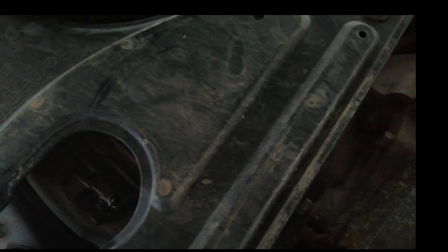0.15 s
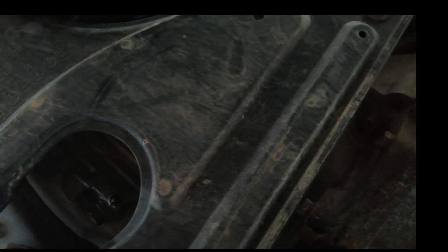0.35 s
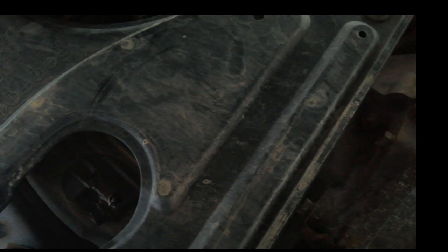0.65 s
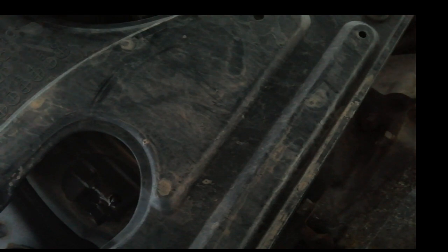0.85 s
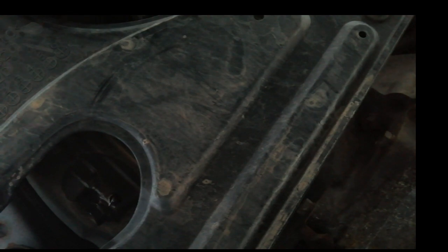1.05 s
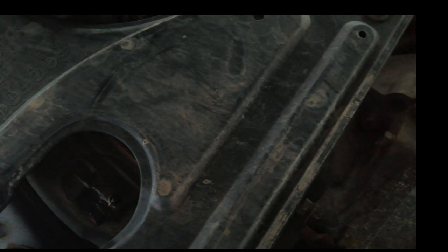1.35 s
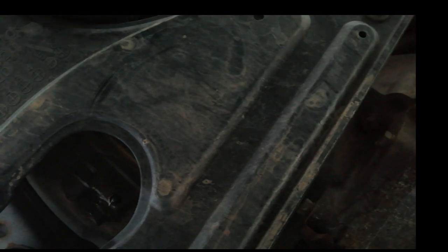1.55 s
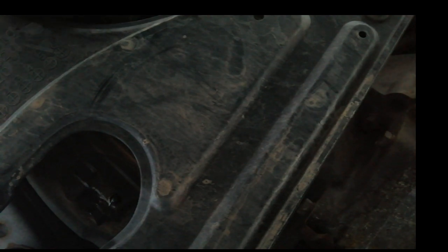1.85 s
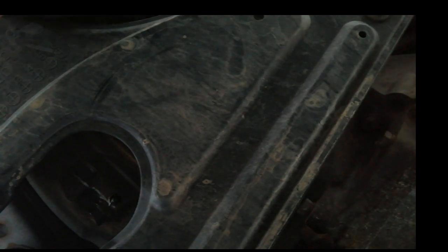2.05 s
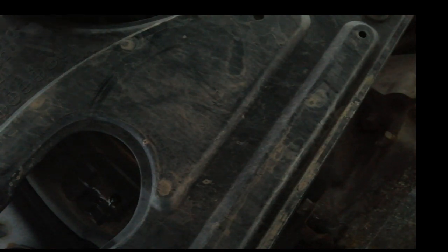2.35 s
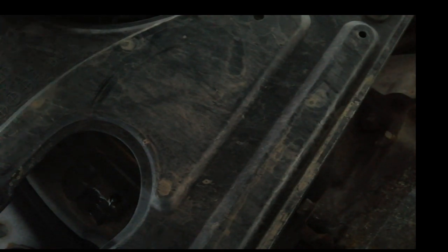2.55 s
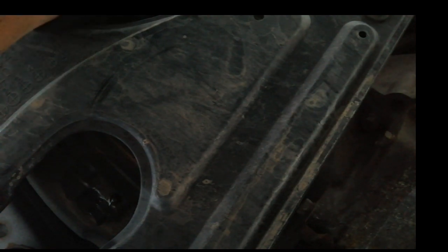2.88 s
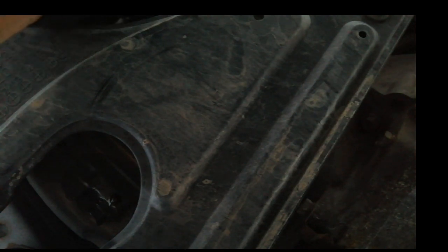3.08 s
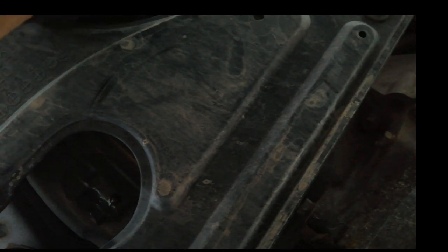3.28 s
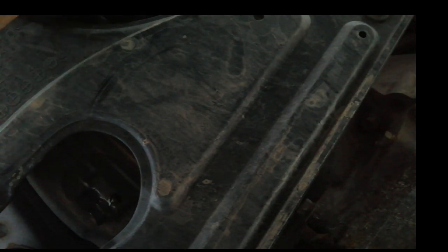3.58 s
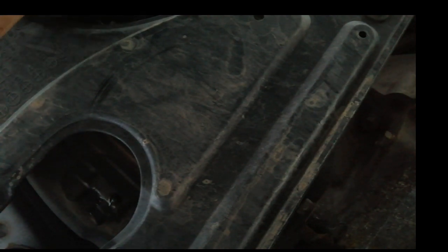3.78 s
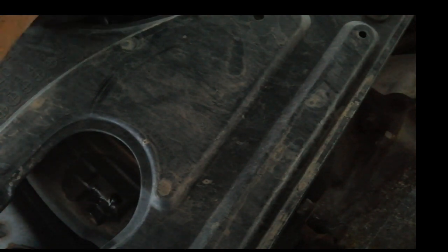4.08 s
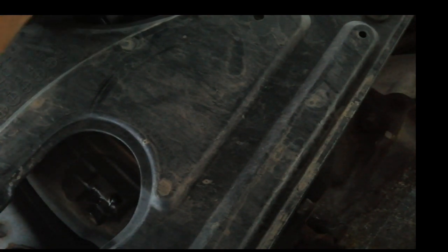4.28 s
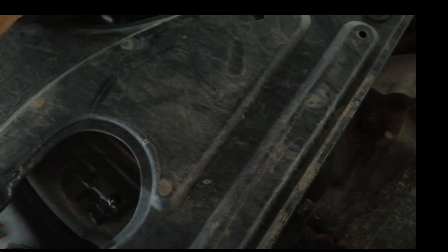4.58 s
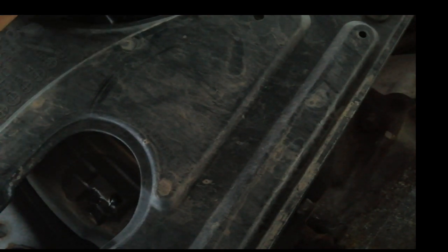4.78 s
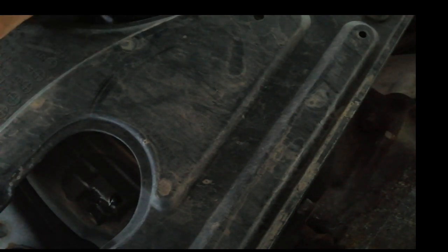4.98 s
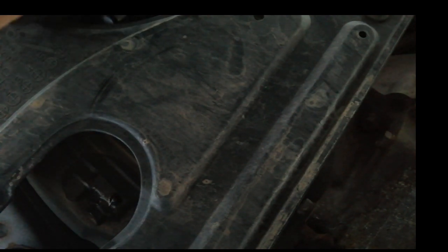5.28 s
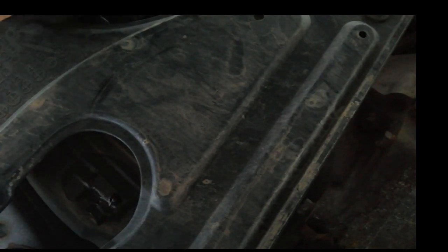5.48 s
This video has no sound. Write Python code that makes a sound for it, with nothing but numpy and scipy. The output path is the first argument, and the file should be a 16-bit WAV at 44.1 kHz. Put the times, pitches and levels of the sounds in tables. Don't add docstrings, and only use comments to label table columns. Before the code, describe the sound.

Oil drops knock irregularly into a plastic pan under a vehicle, with one hard metal clank, handling thumps and a steady high insect hiss.

```python
import sys
import numpy as np
from scipy import signal
from scipy.fft import rfft, irfft, next_fast_len
from scipy.io import wavfile
from scipy.ndimage import uniform_filter1d, minimum_filter1d, map_coordinates

SR = 44100
rng = np.random.default_rng(int(sys.argv[2]) if len(sys.argv) > 2 else 0)


def inscribe(sig):
    pcm = np.round(np.clip(np.atleast_2d(sig).T, -1, 1) * 32767)
    wavfile.write(sys.argv[1], SR, pcm.astype(np.int16))


def level_to_linear(level):
    exponent = np.asarray(level, float) / 20
    return 10 ** exponent


N = 248283

# time in seconds, pitch in Hz.
HUM_PITCH = [(0.0, 70.44), (0.61, 64.96), (0.97, 56.7), (2.13, 67.5), (2.45, 54.06), (3.55, 54.37),
             (3.75, 71), (3.87, 69.66), (4.03, 51.18), (5.63, 53.4)]
# time in seconds, level in dB.
AIR_STIR = [(0, -62), (1.0, -62.5), (1.33, -66.5), (2.18, -60), (2.74, -62.5), (3.92, -54.5), (4.61, -58.5),
            (5.63, -63)]
# frequency in Hz, density in dB per Hz.
RUMBLE_COLOUR = [(18, -42), (30, -19), (45, -6.5), (70, -2.5), (100, -3.5), (125, -10.5), (170, -51.5)]
DRONE_COLOUR = [(90, -17), (130, -1), (250, -1.5), (400, -13), (600, -38)]
OUTDOORS_COLOUR = [(180, -35), (300, -14), (421, -10.5), (606, -12), (768, -10), (1640, -8.5), (2130, -12),
                   (3670, -11.5), (4500, -12), (5850, -24.5), (9900, -120)]

# frequency in Hz, density in dB per Hz.
CHORUS_COLOUR = [(2060, -38), (3500, -38), (4020, -24.5), (4450, -12.5), (6850, -8), (7490, -1.5),
                 (7950, -1.5), (9230, -2.5), (10200, -13), (11900, -15.5), (12600, -17.5), (16400, -42.5),
                 (22000, -120)]
# time in seconds, pulses a second.
PULSE_RATE = [(0, 18.5), (2.3, 16.1), (5.63, 17)]

# start in seconds, peak in dB.
FINGER_SLIPS = [
    (0.002, -44.5),
    (0.248, -43),
    (0.284, -53),
    (0.315, -30.5),
    (0.369, -48),
    (0.457, -30.5),
    (0.496, -31),
    (0.51, -34.5),
    (0.887, -38),
]
# start in seconds, peak in dB, pitch in Hz.
LONE_THUMPS = [
    (0.037, -40.5, 66),
    (0.237, -47, 68),
    (0.451, -42.5, 72.85),
    (0.707, -25, 60),
    (1.565, -31, 52.3),
    (2.187, -27.5, 57.2),
    (2.541, -29, 54),
]
# start in seconds, peak in dB, lag of the second in seconds, its peak in dB.
THUMP_PAIRS = [
    (2.952, -34.5, 0.15, -35),
    (3.43, -32.5, 0.144, -32),
    (3.942, -32.5, 0.15, -33.5),
    (4.467, -33.5, 0.13, -35.5),
    (4.941, -34, .162, -36),
    (5.451, -36.5, 0.13, -35),
]
# start in seconds, hold in seconds, housing level in dB, rasp level in dB.
FINGER_STROKES = [(0.253, 0.036, -50, -54), (0.297, 0.066, -46.5, -46.5), (0.463, 0.055, -42, -49),
                  (0.704, 0.034, -56.5, -60), (0.86, 0.031, -66, -56), (1.106, 0.028, -86, -57.5),
                  (1.221, 0.023, -73.5, -59.5), (2.116, 0.098, -59, -74), (2.393, 0.11, -57.5, -51),
                  (2.816, 0.03, -68.5, -50), (4.195, 0.06, -63.5, -80), (4.607, 0.056, -73, -54.5),
                  (5.235, 0.023, -73, -57)]
# centre in Hz, width in Hz, level in dB.
HOUSING_PEAKS = [(163, 36.4, 0), (228.5, 49, -1), (302, 210, -12.5)]
RASP_PEAKS = [(568, 29, 1.5), (792, 29, -1.5), (995, 50, 3), (1565, 77, -5), (1950, 250, -16.5),
              (2980, 360, -15)]

# mode in Hz, level in dB, 60 dB decay in seconds, # left-right
# difference in dB, left lead in radians.
LOW_PAN_MODES = [(378, -26.5, 0.078, -8, 3.5), (725, -5, 0.082, -1.5, 4.5), (824, -9, 0.06, -12.5, 0),
                 (982, 1, 0.061, -2, 0.86), (1028.3, -4, 0.049, -16.5, 3.0),
                 (1128.7, -1.5, 0.081, -2.5, 1.34), (1190, -18.5, 0.05, 7.5, 1),
                 (1301, -7, 0.09, -16.5, -1.5), (1378.5, -1.5, 0.064, -0.5, -5),
                 (1400, -14.5, 0.084, -3.5, 1), (1507, -0.5, 0.036, 6.5, 1), (1555, -10, 0.05, 10, 1),
                 (1611, -2.5, 0.054, 7.5, 1.06), (1820, -15.5, 0.09, -5, 7)]
# mode in Hz, level in dB, 60 dB decay in seconds,
# left-right difference in dB, left lead in radians.
WALL_MODES = [(2080, -25.5, 0.1, 1, -0.5), (2224, -13, 0.1, -3, 3), (2524, -9.5, 0.1, 2, -1.5),
              (2642, -13, 0.11, -7, -2), (2755, -13.5, 0.081, -9.5, 1), (3167, -18, 0.11, -7, 0.96),
              (3480, -24, 0.093, -10, 3.5), (3810, -23, 0.11, -7.5, -3.5), (4290, -31, 0.12, -15.5, 2),
              (5180, -33, 0.054, -25, -7.5), (5100, -29, 0.081, -5.5, 0.5), (4820, -30.5, 0.11, -10.5, 4.5)]
# start in seconds, peak in dB, favoured pitch in Hz, thud in dB.
BRIGHT_FLECKS = [
    (0.19, -42.5, 1010, -9),
    (0.689, -36.5, 1420, -19),
    (4.085, -32, 1440, -38.5),
    (4.571, -47, 3700, -31),
    (5.397, -61, 980, -5),
]
# start in seconds, peak in dB, favoured pitch in Hz, thud in dB.
DULL_BLOBS = [(1.659, -29, 1500, -26), (1.664, -26, 976, -28), (1.68, -31, 1360, -17.5),
              (2.41, -23, 1600, -18), (2.768, -25, 1400, -24.5), (3.242, -27, 1187, -21.5),
              (3.368, -31, 970, -8.5), (3.479, -45, 1300, -21.5), (3.704, -29.5, 858, -26.5),
              (3.838, -27.5, 1105, -43), (4.16, -52, 1230, 1.5)]
# start in seconds, peak in dB, favoured pitch in Hz, thud in dB.
SOFT_SMEARS = [
    (2.034, -47, 969, -21),
    (3.697, -40.5, 997.6, -6),
    (4.577, -31.5, 1210, -20),
    (5.221, -41, 954, -5.5),
]
# upper modes in dB, 60 dB decay in seconds, smear in Hz.
BLOB_TONE = (-18.5, 0.089, 125)
FLECK_TONE = (-11, 0.07808, 195)
SMEAR_TONE = (-17.5, 0.14, 50)
# frequency in Hz, 60 dB decay in seconds.
UNDERSIDE_DECAY = [(300, 0.13), (1000, 0.22), (3000, 0.18), (10000, 0.024)]

# start in seconds, hold in seconds,
# level in dB, # centre in Hz, width in Hz.
NOISE_BURSTS = [(4.014, 0.01, -55.5, 580, 90), (4.049, 0.0094, -44.5, 3100, 1200),
                (4.049, .003, -43.5, 3000, 3600), (4.086, 0.0037, -39, 2600, 2100),
                (4.095, .018, -47.5, 1600, 800), (.905, 0.043, -49, 215, 29), (3.838, .008, -49, 3300, 500),
                (4.576, .008, -50.5, 3850, 410), (5.235, 0.027, -50, 3260, 1000),
                (4.922, 0.03, -51, 1390, 53), (1.67, 0.025, -46, 1500, 900), (3.7, .1, -54, 3500, 1500),
                (2.2, 0.039, -63, 570, 73), (4.8, 0.044, -66, 252, 53), (5, 0.062, -55, 975, 70),
                (4.14, 0.014, -55, 3200, 1000), (4.6, 0.012, -54.5, 840, 350), (5.2, 0.01, -60, 1200, 400),
                (4.275, 0.042, -55.5, 2500, 600), (4.4, 0.013, -53, 3700, 1500),
                (4.2, 0.054, -73, 2900, 1500), (4.5, 0.019, -53, 2500, 1100), (0.27, .008, -54, 2150, 760)]

# start in seconds, peak in dB.
CLOTH_TICKS = [(0.7893, -37.5), (1.058, -42), (1.1841, -37.5), (3.369, -34.5), (4.336, -32.5),
               (4.366, -33.5), (4.4688, -31), (4.575, -26), (4.5807, -32), (4.599, -30), (4.809, -33.5),
               (5.231, -40)]
# start in seconds, hold in seconds, level in dB.
CLOTH_STROKES = [
    (3.635, 0.23, -56.5),
    (4.3, 0.17, -50.5),
    (4.584, 0.01, -42),
    (4.65, 0.29, -58.5),
    (4.798, 0.012, -57.5),
    (4.966, 0.017, -47.5),
    (5.23, 0.014, -47),
]
# frequency in Hz, density in dB per Hz.
CLOTH_COLOUR = [(2000, -22.5), (3600, -11.5), (5500, -11), (8500, -10), (10300, -1.5), (12000, -10.5),
                (15800, -22)]

# start in seconds, peak in dB.
CLANK_HIT = [
    (1.543, -3.5),
]
# pitch in Hz, level in dB, 60 dB decay in seconds.
CLANK_BOOM = (380, -21.5, 0.15)
# pitch in Hz, level in dB, 60 dB decay in seconds.
CLANK_MODES = [(946, -6, 0.11), (997, -11.5, 0.09), (1204, -11, 0.09), (1286, -9, 0.14), (1365, -7.5, 0.13),
               (1467, -8.5, 0.098), (1662, -10, 0.15), (1760, -8, 0.1), (1848, -5.5, 0.1), (1890, -9, 0.09),
               (1990, -10, 0.075), (2760, -9.5, 0.08), (3460, -18.5, 0.062), (3690, -19, 0.068),
               (2130, -6.5, 0.1), (2333, -11.5, 0.09), (2580, -13.5, 0.13), (2954, -5.5, 0.08),
               (3170, -9.5, 0.073), (4670, -26.5, 0.085), (1586, -9, 0.1), (5880, -31, 0.19),
               (7160, -30, 0.055), (9550, -25, 0.084), (9030, -14.5, 0.062), (10580, -1.5, 0.044),
               (10770, -8, 0.06), (10700, -14.5, 0.045), (11600, -7.5, 0.03), (13600, -21.5, 0.0513),
               (14000, -40, 0.12)]
# frequency in Hz, density in dB per Hz.
CRACK_COLOUR = [(150, -39.5), (250, -14.5), (660, -20), (967, -14.5), (1230, -5), (1520, -2), (2510, -12.5),
                (3150, -4), (3430, -12), (6190, -26), (6750, -19.5), (10800, -23.5), (15800, -39)]
# mode in Hz, level in dB, 60 dB decay in seconds, left-right difference in dB.
STEEL_MODES = [(802, -8, .35, -20), (866, -1, .6, -12), (985, -9, .22, -8), (1168, -4, .45, -7),
               (1382, -7, .35, -2), (1514, -7, .9, 2), (1650, -12, .35, 3)]

# start in seconds, peak in dB, favoured pitch in Hz, hardness in dB,
# favoured wall pitch in Hz.
OIL_DROPS = [
    (2.108, -7, 1007, -21, 2760),
    (3.076, -9, 1086, -18.5, 2600),
    (3.517, -19.5, 1090, -22, 2620),
    (4.4, -3.5, 1350, -11.5, 3170),
    (4.915, -26.5, 982, -23.5, 2500),
    (5.443, -7, 1000, -13, 2580),
]
# pitch in Hz, level in dB, second pitch in Hz, its level in dB.
DROP_QUIRKS = [(1128, 4.5, 1615, 4), (1128, 2, 1520, 4), (985, -3.5, 1128, 5), (1034, 12.5, 960, 7),
               (1390, 6, 1800, -6), (1128, 0.5, 1530, 7.5)]
# frequency in Hz, density in dB per Hz.
SPRAY_COLOUR = [(240, -63.5), (600, -33), (900, -11.5), (1200, -0.5), (1640, -8), (2090, -18.5),
                (3210, -15), (4600, -28), (6000, -33.5), (10400, -33), (14000, -49.5)]

# start in seconds, peak in dB, pitch in Hz, glide in Hz a second,
# 60 dB decay in seconds.
OIL_BUBBLE = (4.161, -36, 1290, -4000, .08)


def unit(x):
    return x / np.sqrt(np.mean(x ** 2) + 1e-20)


def along(points, hz):
    f, v = np.transpose(points)
    return np.interp(np.log(hz + 1), np.log(f + 1), v)


def curve(rows):
    s, value = np.transpose(rows)
    return np.interp(np.arange(N) / SR, s, value)


def gains(s, hold, db, rise, fall):
    t = np.arange(0, N + 64, 64) / SR
    late = t - s[:, None]
    swell = rise * np.minimum(late, 0)
    fade = fall * np.maximum(late - hold[:, None], 0)
    gain = level_to_linear(db[:, None] + swell - fade).sum(axis=0)
    return np.interp(np.arange(N) / SR, t, gain)


def wobble(rate):
    knots = rng.standard_normal(int(N * rate / SR) + 4)
    return map_coordinates(knots, [np.arange(N) * rate / SR])


def filtered(x, response):
    m = next_fast_len(N + SR // 2)
    return irfft(rfft(x, m) * response(np.fft.rfftfreq(m, 1 / SR)), m)[..., :N]


def resonances(peaks):
    def response(f):
        total = 0
        for k, (centre, width, db) in enumerate(peaks):
            band = 1j * f * width
            total = total + (-1) ** k * level_to_linear(db) * band / (centre * centre - f * f + band)
        return total
    return response


def pair(alike, spiky_db=0):
    a, b = rng.standard_normal((2, N)) * level_to_linear(spiky_db * np.minimum(rng.exponential(size=N), 5))
    turn = np.arccos(np.clip(alike, -1, 1)) / 2
    mid, side = np.cos(turn) * a, np.sin(turn) * b
    return np.array([mid + side, mid - side])


def rush(spectrum, alike, spiky_db=0, ripple_db=0):
    voices = rng.standard_normal(SR // 100)

    def colour(hz):
        return level_to_linear(along(spectrum, hz) + ripple_db * map_coordinates(voices, [hz / 60]))
    return unit(filtered(pair(alike, spiky_db), colour))


def add(track, s, sound):
    start = round(s * SR)
    track[:, start:start + sound.shape[1]] += sound[:, :N - start]


def patchy(x, depth_db):
    z = signal.stft(x, nperseg=512)[2]
    field = uniform_filter1d(rng.standard_normal(z.shape[1:]), size=6, axis=0)
    field = uniform_filter1d(field, size=10, axis=1)
    return unit(signal.istft(z * level_to_linear(depth_db * unit(field)), nperseg=512)[1][:, :N])


def surroundings():
    turns = np.cumsum(curve(HUM_PITCH) + 3 * wobble(12)) / SR
    hum = level_to_linear(-49 + 2.8 * wobble(12)) * np.sin(2 * np.pi * turns + [[-.1], [.1]])
    air_db = curve(AIR_STIR)
    rumble = level_to_linear(-57 + 0.24 * (air_db - air_db.min())) * rush(RUMBLE_COLOUR, 0.98)
    drone = level_to_linear(-66.5 + 1.5 * wobble(12)) * rush(DRONE_COLOUR, 0.86)
    open_air = patchy(rush(OUTDOORS_COLOUR, 0.049), depth_db=3.5)
    return hum + rumble + drone + level_to_linear(air_db + 0.5 + 1.5 * wobble(15)) * open_air


def insects():
    t = np.arange(N) / SR
    voices_db = 1.8
    chorus = level_to_linear(-48 + 0.72 * wobble(8.1)) * rush(CHORUS_COLOUR, 0.027, ripple_db=voices_db)
    hush_s, resume_s, hush_db, resume_db_per_s = 1.55, 5.25, -16.5, 25
    recovery_db = hush_db + resume_db_per_s * np.maximum(t - resume_s, 0)
    startled_db = (t > hush_s) * np.minimum(recovery_db, 0)
    low_band = [(5900, -45.5), (6450, 2.0), (7100, 0.0), (7700, -34.0)]
    low = level_to_linear(-56.5 + startled_db + 0.76 * wobble(31)) * rush(low_band, .03, ripple_db=voices_db)
    whistle = level_to_linear(-64.5 + 2.5 * wobble(2)) * np.sin(2 * np.pi * 8075 * t + [[0], [1.2]])
    turns = np.cumsum(curve(PULSE_RATE)) / SR + .4
    beat = .4 + .6 * (.5 + .5 * np.cos(2 * np.pi * turns)) ** 1.5
    top_band = [(11000, -26.0), (12600, -3.0), (13600, -3.5), (14700, 2.5), (15800, -6.5)]
    pulsing = level_to_linear(-64.5 + 1.5 * wobble(4.3)) * beat * rush(top_band, .05)
    return (chorus + low + whistle + pulsing) * level_to_linear([[-.9], [.9]])


def splash(t60, alike=0.41):
    t = np.arange(SR // 6) / SR
    envelope = level_to_linear(-60 * t / t60) * (1 - np.exp(-t / 0.0017))
    a, b = rng.standard_normal((2, len(t))) * envelope
    side = np.sqrt(1 - np.clip(alike, 0, 1))
    return np.array([a + side * b, a - side * b])


def thumps():
    out, t = np.zeros((2, N)), np.arange(SR // 8) / SR
    pair_hz, half_cycles = 54, 0.88
    hits = list(LONE_THUMPS)
    for s, first_db, lag, second_db in THUMP_PAIRS:
        hits += [(s, first_db, pair_hz), (s + lag, second_db, pair_hz)]
    for s, db, hz in hits:
        late, half = t - .05, half_cycles / hz
        push = np.sin(2 * np.pi * hz * late + [[-.1], [.1]])
        add(out, max(s - .025, 0), level_to_linear(db) * np.exp(-.5 * (late / half) ** 2) * push)
    return out


def fingers():
    slips = np.zeros((2, N))
    for s, db in FINGER_SLIPS:
        add(slips, s, level_to_linear(db + 9.0) * splash(t60=0.05, alike=0.27))
    s, hold, housing_db, rasp_db = np.transpose(FINGER_STROKES)
    rise, fall = 600, 410
    shell_noise = unit(filtered(pair(0.93, spiky_db=2), resonances(HOUSING_PEAKS)))
    shell = gains(s, hold, housing_db, rise, fall) * shell_noise
    grains = pair(0.078, spiky_db=3.0) * level_to_linear(3.4 * wobble(80))
    rasp_noise = unit(filtered(grains, resonances(RASP_PEAKS)))
    rub = level_to_linear(-3.0) * gains(s, hold, rasp_db, rise, fall) * rasp_noise
    skin = level_to_linear([[2.5], [-1]]) * (rub + filtered(slips, resonances(RASP_PEAKS)))
    return shell + skin + level_to_linear(-9.5) * filtered(slips.sum(axis=0), resonances(HOUSING_PEAKS))


def ring(hz, db, t60, side_db, lead, rise, blur_hz, punch=0.87):
    t = np.arange(int(SR * .6 * t60.max())) / SR
    ear = np.array([.5, -.5])[:, None]
    first = 1 + punch * np.exp(-t / 0.052)
    decay = first * level_to_linear(-60 * t / t60[:, None]) * (1 - np.exp(-(t / rise) ** 2))
    steps = rng.standard_normal((len(hz), SR // 32))
    knots = np.cumsum(steps, axis=1) * np.sqrt(2 * np.pi * np.abs(blur_hz) * 32 / SR)
    coarse = t[::32]
    wander = np.array([np.interp(t, coarse, k[:len(coarse)]) for k in knots])
    phase = 2 * np.pi * hz[:, None] * t + wander
    level = level_to_linear(db + ear * side_db)[..., None]
    out = (level * np.sin(phase + (ear * lead)[..., None]) * decay).sum(axis=1)
    return out / np.abs(out).max(axis=1).mean()


def pan_ring(spot_hz, favour_db, upper_db, pan_db, shorter, rise, blur_hz, wall_hz=1, also=(1, 0, 1, 0), lag=0):
    hz, level, t60, side_db, lead = np.transpose(LOW_PAN_MODES + WALL_MODES)
    upper = hz > 1950

    def near(centre_hz, width):
        return np.exp(-(np.log(hz / centre_hz) / width) ** 2)
    hardness_db = upper_db + 21.0 + (upper_db + 18.0) * 1.7 * np.log(hz / 2600)
    favour = favour_db * near(spot_hz, 0.18) + hardness_db * upper + 4.2 * near(wall_hz, 0.072)
    for at_hz, db in (also[:2], also[2:]):
        favour = favour + db * near(at_hz, 0.035)
    chance_db = (0.49 + 1.5 * upper) * rng.standard_normal(len(hz))
    decay = t60 * shorter * (1 - 0.12 * upper)
    rise = rise * (1 + lag * upper[:, None])
    return ring(hz, level + favour + chance_db, decay, side_db + pan_db, lead, rise, blur_hz)


def spatters():
    out, thuds = np.zeros((2, 2, N))
    kinds = (DULL_BLOBS, BLOB_TONE), (BRIGHT_FLECKS, FLECK_TONE), (SOFT_SMEARS, SMEAR_TONE)
    for rows, (upper_db, t60, smear_hz) in kinds:
        spread = t60 / 0.079
        rise = 0.00052 * spread ** 5
        for s, db, spot_hz, thud_db in rows:
            knock = pan_ring(spot_hz, 8.5, upper_db, 1.2, 1.47 * spread, rise, blur_hz=smear_hz)
            add(out, s - .001, level_to_linear(db + 1.0) * knock)
            add(thuds, s, level_to_linear(db + thud_db + 20.0) * splash(0.81 * t60, alike=0.8204))
    return out + filtered(thuds, resonances([(255, 75, 2.0), (427, 250, -5.0), (656, 350, -5.5)]))


def underside(x):
    hz, t, z = signal.stft(rng.standard_normal((2, SR // 3)), SR, nperseg=256)
    fade = level_to_linear(-60 * t / along(UNDERSIDE_DECAY, hz)[:, None])
    tail = signal.istft(z * fade, SR, nperseg=256)[1]
    return signal.fftconvolve(x, tail / np.linalg.norm(tail[0]), axes=1)[:, :N]


def bursts():
    out, t = np.zeros((2, N)), np.arange(SR // 6) / SR - .01
    f = np.fft.rfftfreq(len(t), 1 / SR)
    rise, fall = 4000, 860
    for s, hold, db, hz, width_hz in NOISE_BURSTS:
        noise = rng.standard_normal((2, len(t))) * level_to_linear(2.6 * rng.standard_normal(len(t)))
        band = unit(irfft(rfft(noise) / (1 + ((f - hz) / width_hz * 2) ** 4), len(t)))
        stroke_db = db + rise * np.minimum(t, 0) - fall * np.maximum(t - hold, 0)
        add(out, s - .01, level_to_linear(stroke_db) * band)
    return out


def cloth():
    snaps = np.zeros((2, N))
    for s, db in CLOTH_TICKS:
        add(snaps, s, level_to_linear(db + 11.5) * splash(t60=0.018))
    ticks = filtered(snaps, resonances([(10500, 730, 0.011)]))
    grain = level_to_linear(2 * wobble(70)) * rush(CLOTH_COLOUR, .45, spiky_db=4.5)
    strokes = gains(*np.transpose(CLOTH_STROKES), rise=740, fall=430) * grain
    return level_to_linear([[3], [-1.5]]) * (strokes + ticks)


def steel_ring(tilt):
    hz, level, t60, side_db = np.transpose(STEEL_MODES)
    chance = rng.standard_normal((3, len(hz)))
    level = level + 1.2 * chance[0] + tilt * (hz - 1200)
    return ring(hz, level, t60, side_db + 2 * chance[1], .5 * chance[2], rise=0.004, blur_hz=2.5)


def clank():
    out, crack = np.zeros((2, 2, N))
    hz, level, t60 = np.transpose([CLANK_BOOM, *CLANK_MODES])
    chance = rng.standard_normal((2, len(hz)))
    side_db = 3.4 * chance[0] - 1.5 + 0.00098 * hz
    lead = 1.37 * chance[1] * np.minimum(hz / 1200, 1) ** 2
    blur_hz = 1.5 + 0.0036 * hz[:, None]
    s, db = CLANK_HIT[0]
    metal = ring(hz, level, 0.71 * t60, side_db, lead, rise=0.0022, blur_hz=blur_hz, punch=-0.33)
    add(out, s - .001, level_to_linear(db + 2.0) * metal)
    add(out, s, level_to_linear(db - 27.5) * steel_ring(tilt=0.017))
    add(crack, s - .0005, level_to_linear(db + 4.5) * splash(t60=0.089))
    return out + filtered(crack, lambda f: level_to_linear(along(CRACK_COLOUR, f)))


def drops():
    out, spray = np.zeros((2, 2, N))
    blur_hz = 3.9 * (np.array(LOW_PAN_MODES + WALL_MODES)[:, :1] / 1000) ** 1.8
    for (s, db, spot_hz, upper_db, wall_hz), also in zip(OIL_DROPS, DROP_QUIRKS):
        lag = .25 * max(-15 - upper_db, 0)
        knock = pan_ring(spot_hz, 10.4, upper_db, 1.3, shorter=1.0, rise=.0012, blur_hz=blur_hz,
                         wall_hz=wall_hz, also=also, lag=lag)
        add(out, s - .0007, level_to_linear(db + 4.5) * knock)
        add(out, s, level_to_linear(db - 28.5) * steel_ring(tilt=-0.0037))
        spray_db = 0.79 * db + 0.6 * upper_db + 11
        add(spray, s - .001, level_to_linear(spray_db) * splash(t60=0.099))
    return out + filtered(spray, lambda hz: level_to_linear(along(SPRAY_COLOUR, hz)))


def bubble():
    out, t = np.zeros((2, N)), np.arange(SR // 10) / SR
    s, db, hz, glide, t60 = OIL_BUBBLE
    envelope = level_to_linear(db - 60 * t / t60) * (1 - np.exp(-t / 0.00204))
    add(out, s, envelope * np.sin(2 * np.pi * (hz + glide * t / 2) * t + [[.6], [-.6]]))
    return out


def scene():
    knocks = spatters() + bursts() + clank() + drops() + bubble()
    return surroundings() + insects() + thumps() + fingers() + knocks + level_to_linear(-19.0) * underside(knocks) + cloth()


def starved(x):
    size, loud = round(.013 * SR), .12
    level = np.abs(x).max(axis=0)
    soon = np.roll(-minimum_filter1d(-level, size=size), -size // 2) > loud
    near = -minimum_filter1d(-level, size=SR // 130) > loud
    place = (np.arange(N) - 333) % 1024
    robbed = soon & ~near & (place > 540) & (place < 950)
    gap = uniform_filter1d(robbed * 1., size=SR // 500)
    quiet = x * uniform_filter1d(1. - near, size=SR // 500)
    return x - gap * filtered(quiet, lambda hz: (hz > 700) & (hz < 5600))


def low_pass(x):
    return signal.sosfilt(signal.butter(12, 16280, fs=SR, output="sos"), x)


def record(dry):
    loud = -minimum_filter1d(-np.abs(dry).max(axis=0), size=SR // 60)
    keep = np.exp(-1 / (.06 * SR))
    held = signal.lfilter([1 - keep], [1, -keep], loud)
    drive = uniform_filter1d(np.maximum(held, 0.12 * loud), size=SR // 200)
    ducked = dry * level_to_linear(-4 * np.tanh(drive / 0.24))
    ceiling = .8
    rounded = starved(ducked) / (1 + np.abs(ducked / ceiling) ** 6) ** (1 / 6)
    mix = filtered(rounded, lambda hz: hz < 15800)
    return low_pass(mix)


dry = scene()
out = record(dry)
inscribe(out)
```